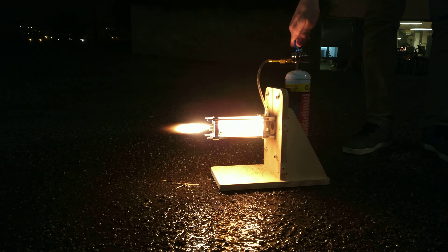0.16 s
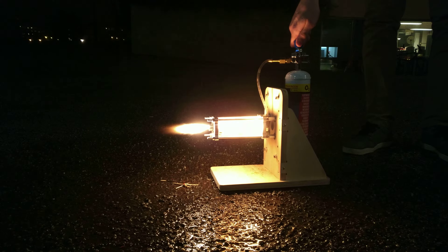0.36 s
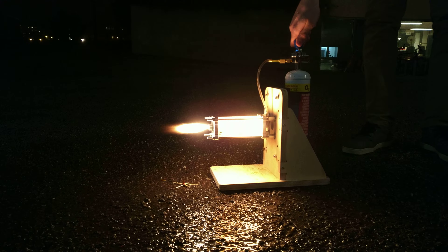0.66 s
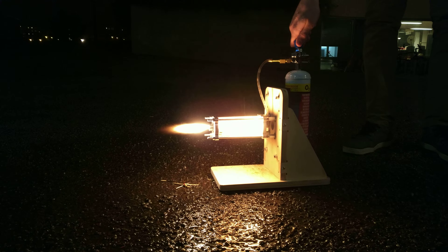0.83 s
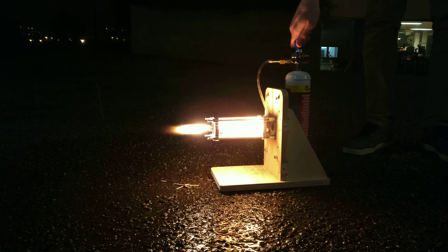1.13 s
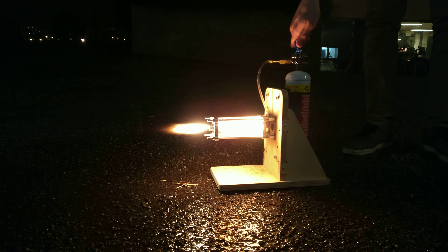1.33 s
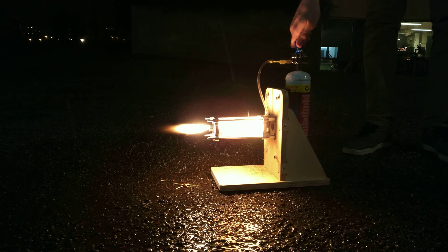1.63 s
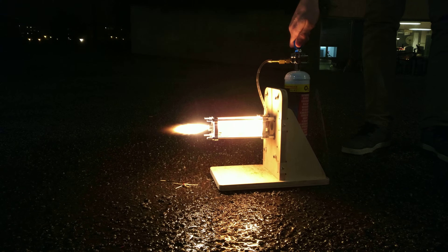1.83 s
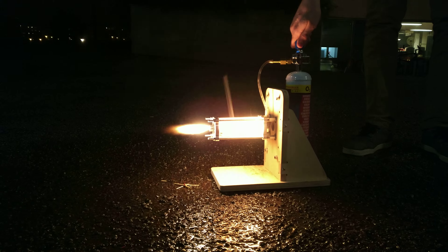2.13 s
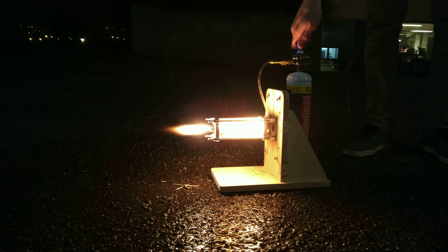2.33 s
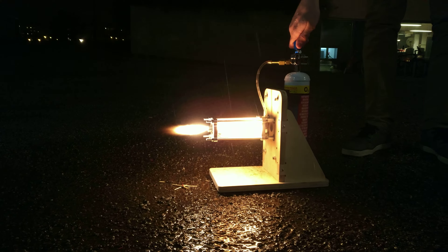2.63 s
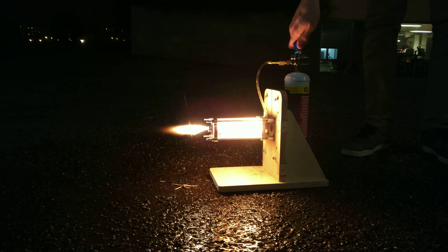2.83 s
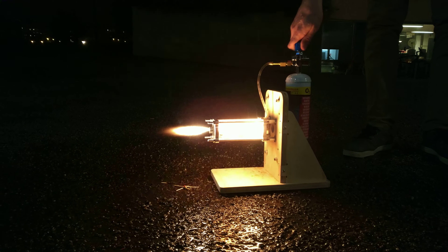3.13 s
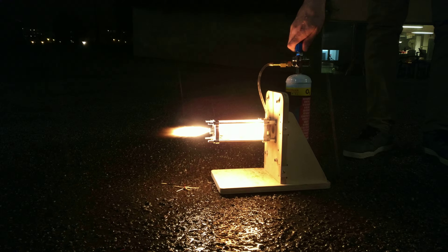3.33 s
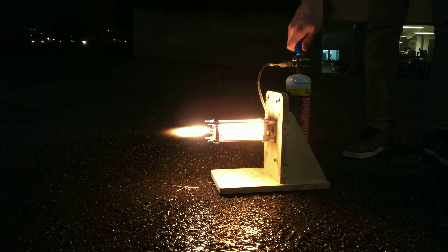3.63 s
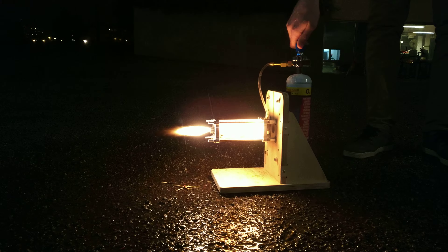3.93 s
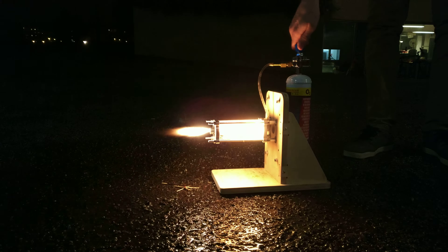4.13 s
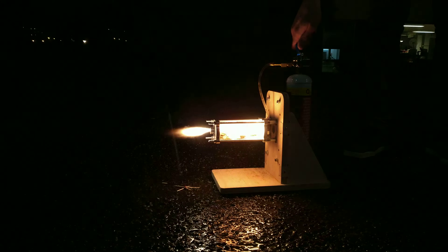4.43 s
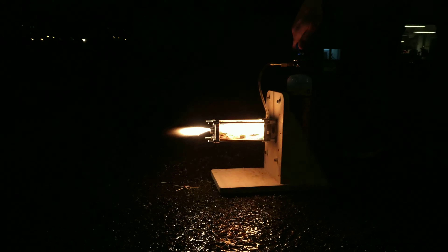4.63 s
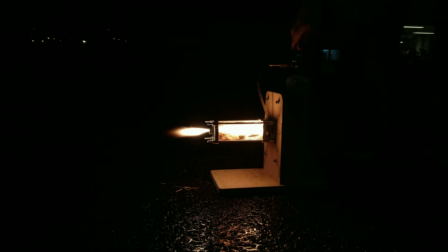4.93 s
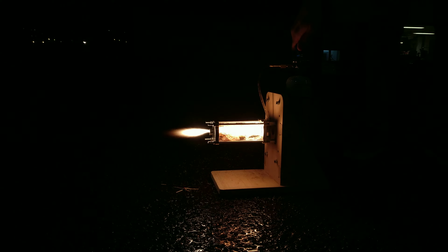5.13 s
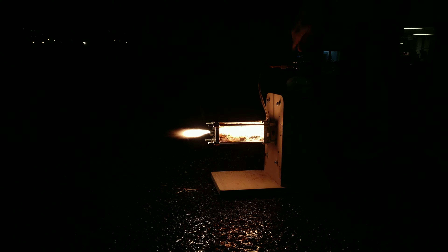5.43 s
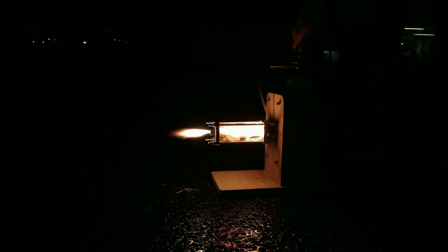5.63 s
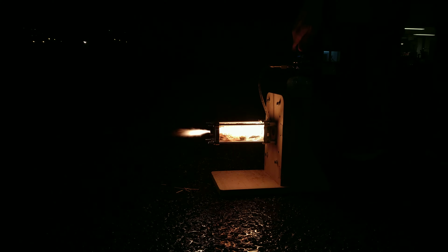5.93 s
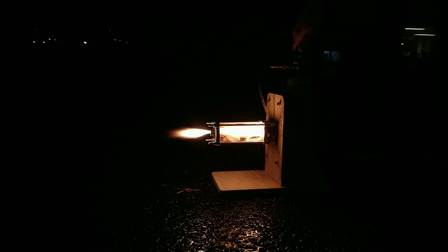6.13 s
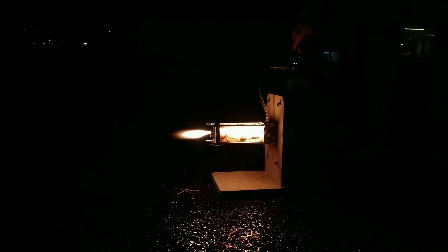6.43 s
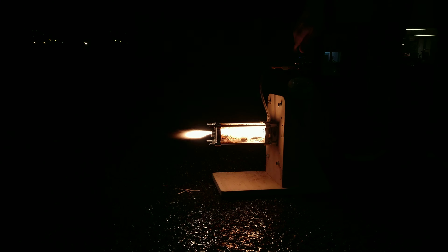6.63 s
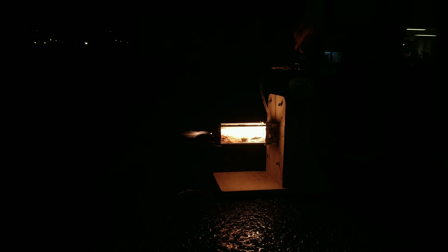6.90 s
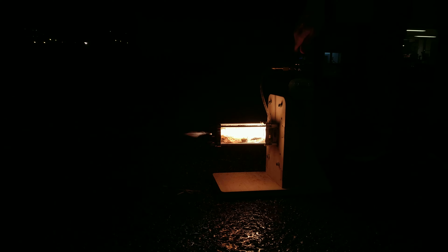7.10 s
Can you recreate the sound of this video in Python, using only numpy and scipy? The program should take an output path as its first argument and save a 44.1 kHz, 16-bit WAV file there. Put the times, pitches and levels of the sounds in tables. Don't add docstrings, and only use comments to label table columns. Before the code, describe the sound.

Already burning at the start and still going at the end, a jet of flame roars unevenly from a nozzle while cold gas hisses steadily above it. Thudding pops and quick stutters break in at irregular moments, sparse at first, then denser, with short drops as the flame lifts and snaps back. Open outdoor space, no room echo, only a very early bounce off wet ground; close phone microphones with shifting treble between left and right.

```python
import sys
import numpy as np
from scipy import signal
from scipy.fft import rfft, irfft
from scipy.io import wavfile
from scipy.ndimage import uniform_filter1d, map_coordinates

SR = 44100
rng = np.random.default_rng(int(sys.argv[2]) if len(sys.argv) > 2 else 0)


def persist_wave(psi):
    counts = np.round(np.clip(psi, -1, 1) * 32767).astype(np.int16)
    wavfile.write(sys.argv[1], SR, np.atleast_2d(counts).T)


def gain_from_decibels(decibels):
    exponent = np.asarray(decibels, float) / 20
    return 10 ** exponent


N = 320166
HZ = np.fft.rfftfreq(N, 1 / SR)
T = np.arange(N) / SR

# (frequency [Hz], left level [dB per Hz], right level [dB per Hz],
# share of flame against cold gas [0-1])
PORT_COLOURS = [(70, -58, -58.5, 0.95), (426, -66.5, -66.5, 0.87), (546, -57, -68, 1),
                (834, -62.5, -76.5, 0.99), (1510, -60.5, -64.5, 0.89), (2150, -59.5, -58.5, 0.9),
                (3070, -59, -61, 0.94), (4520, -51, -62.5, 0.67), (6210, -59, -61.5, 0.52),
                (7500, -62.5, -61, 0.28), (8720, -64, -64.5, 0.28), (10590, -56, -50.5, 0.14),
                (12600, -61.5, -52, 0.03), (15500, -58.5, -52, 0.05)]
# (frequency [Hz], likeness [0-1], right leads by [rad])
STEREO_LIKENESS = [(70, .99, -.1), (500, .99, -.9), (750, .94, -.4), (950, .87, .4), (1550, .4, 1.1),
                   (1880, .97, 2.8), (2120, .97, 2.8), (2260, .75, 1.5), (3600, .75, 1.2), (4300, .4, 2.4),
                   (6000, .65, 4.1), (7800, .9, 6.1), (8900, .85, 6.0), (9500, .65, 4.4), (11000, .65, 5.7),
                   (15500, .7, 6.1)]

# (time [s], extra path by the ground [cm], strength of the ground's treble [0-1])
GROUND_PATH = [(0, 11.5, 1), (.4, 11.25, 1), (1.3, 11.25, 1), (2, 11.45, 1), (2.7, 11.3, 1),
               (5.3, 11.35, 1), (5.9, 11.5, 1), (6.0, 11.8, .6), (6.85, 11.75, .6), (7.05, 11.4, .7),
               (7.26, 11.4, .8)]
ASPHALT_GAIN = [0.6, 0.83]
ASPHALT_TOP_HZ = [12000, 17600]
SOUND_CM_S = 34300

# (time [s], turn of the left port [-1 away from the jet to 1 towards it])
PHONE_TURN = [(0, -.9), (.5, -.45), (1.5, -0.77), (1.85, -.3), (2.95, -.6), (3.1, 0.74), (3.8, 1),
              (4.05, .8), (4.2, -.3), (4.65, -.3), (4.8, 0.37), (5.3, 0.83), (5.85, .5), (6.4, 0.66),
              (6.6, 0.14), (6.85, -.6), (7.05, -1.1), (7.26, -0.98)]
# (frequency [Hz], width [Hz], level at rest [dB], level per unit of turn [dB],
# drift [dB per s])
HAND_SHADE = [(11400, 240, 0, -6.5, 0.08), (13150, 630, -2.5, .5, 1.64), (14700, 810, 0.5, 4.5, 0.2)]

# (time [s], thump [dB], crack [dB])
SINGLE_POPS = [(.213, -2, -12), (.955, -2, 9), (1.316, -6, 11), (1.691, 1, -4), (2.428, 0, 5),
               (2.591, -5, -1), (2.708, -1, 6), (2.872, -5, -6), (2.936, -6, 5), (3.134, 1, 3),
               (3.149, -5, 0), (3.291, -5, 9), (3.393, -2, -2), (3.462, -3, 1), (5.114, -4, -9),
               (5.26, -5, 4), (5.324, -3, 6), (5.35, -3, 0), (5.375, -6, 4), (5.42, -7, -8),
               (5.713, -2, -2), (5.76, -2, 9), (5.801, 2, -13), (5.898, -2, 1), (6.021, -9, -8),
               (6.878, -7, -6), (7.136, -2, -5), (7.183, -1, 0), (7.206, 4, -2), (7.221, -4, -11.5)]
# (time [s], time lifted [ms], depth [dB], crack [dB])
FLAME_RELIGHTS = [(1.958, 14.4, 10, 4), (1.985, 18, 11, -8), (3.858, 15, 4, 4), (4.119, 42, 11.5, 0),
                  (4.188, 23, 5.5, -12), (4.528, 20.4, 10.5, 3), (4.887, 31, 8.5, 2), (5.03, 9.4, 3, 4),
                  (5.176, 13, 11, 4), (5.199, 12.8, 8, 6), (5.224, 16.7, 8, 4), (5.297, 10, 5, 3),
                  (5.405, 18, 7, 0), (5.555, 15, 5, 10), (5.689, 10.7, 13, -11), (5.79, 53, 8.5, 2),
                  (5.845, 15, 4, -4), (5.945, 17, 6, 3), (6.417, 17.6, 8.5, -5), (6.945, 51, 12, 10),
                  (6.996, 40, 13, 9), (7.05, 40, 9, 10), (7.079, 22, 13, -2), (7.119, 23, 13.5, -8),
                  (7.253, 20, 9, -4)]
# (start [s], length [ms], thump [dB], crack [dB])
STUTTER_RUNS = [(1.905, 27, -2, -2), (2.821, 29, -3, 1), (3.064, 21, -4, -6), (3.189, 27, -6, -9),
                (4.398, 19, -7, -6), (4.16, 13.5, -8, -11), (4.84, 7.7, -10, 0), (4.897, 12, -8, -3),
                (4.991, 11.8, 0, -6), (5.043, 11, -12, -3), (6.357, 30, -11, -10), (6.548, 23.6, -2, -3),
                (6.763, 12.3, -6, -9), (6.953, 6, -4, 0), (7.165, 5.4, -16, -7)]
# (time [s], flame level [dB])
VALVE_FLAME = [(0, 1.5), (.5, 0), (1, -0.5), (1.5, -0.2), (2.75, 1), (2.95, 2.1), (3.4, 2.5), (3.8, 1.9),
               (4.05, 2.5), (4.2, 0.8), (4.65, 2), (5.85, 2.2), (6.4, 3.5), (6.6, 2), (6.85, 2.6),
               (7.05, 2), (7.26, 1.5)]

# (frequency [Hz], width [Hz], level [dB])
DEAD_SPOTS = [
    [(9270, 170, -9), (10650, 200, -5), (12600, 300, -8), (1800, 40, -5)],
    [(3930, 100, -14), (6800, 80, -4), (1200, 60, -5)],
]
# (delay [ms], gain [ratio])
NEAR_BOUNCES = [
    [(1.333, -0.1), (1.565, -0.12), (2.161, -0.17), (2.651, 0.088), (2.783, -0.07), (3.062, -0.025),
     (3.244, -0.19)],
    [(0.496, -0.081), (0.592, -0.1), (1.264, -0.1), (2.898, -0.053), (3.918, 0.26), (4.076, 0.037),
     (5.883, 0.084)],
]


def shape(x, gain):
    return irfft(rfft(x) * gain, N)


def bump(hz, width):
    return np.exp(-.5 * ((HZ - hz) / width) ** 2)


def over_hz(table):
    hz, *columns = np.transpose(table)
    return [np.interp(np.log(HZ + 1), np.log(hz), c) for c in columns]


def over_time(table):
    s, *columns = np.transpose(table)
    return [np.interp(T, s, c) for c in columns]


def walk(rate):
    hold = int(SR / rate)
    steps = np.repeat(rng.standard_normal(N // hold + 1), hold)
    return 1.17 * uniform_filter1d(uniform_filter1d(steps, hold), hold)[:N]


def flame_share():
    return np.clip(over_hz(PORT_COLOURS)[2], 0, 1)


def port_noise(share):
    left_db, right_db, _ = over_hz(PORT_COLOURS)
    like, lead = over_hz(STEREO_LIKENESS)
    like = np.clip(like, 0, 1)
    common, own = rng.standard_normal((2, N)) * np.sqrt(SR / 2)
    left = shape(common, like * np.exp(-1j * lead) * gain_from_decibels(left_db) * share)
    left = left + shape(own, np.sqrt(1 - like ** 2) * gain_from_decibels(left_db) * share)
    right = shape(common, gain_from_decibels(right_db) * share)
    return np.array([left, right])


def ground(x):
    path_cm, treble = over_time(GROUND_PATH)
    at = np.arange(N) - path_cm / SOUND_CM_S * SR
    copy = np.array([map_coordinates(port, [at], order=5) for port in x])
    gains = [g / (1 + (HZ / hz) ** 4) for g, hz in zip(ASPHALT_GAIN, ASPHALT_TOP_HZ)]
    copy = shape(copy, np.array(gains))
    top = shape(copy, 1 / (1 + (12000 / (HZ + 1)) ** 8))
    return x + copy + (treble - 1) * top


def gas(turn):
    left, right = port_noise(np.sqrt(1 - flame_share())) * gain_from_decibels(0.1 * walk(3.4))
    for hz, width, rest_db, turn_db, drift_db in HAND_SHADE:
        shade = gain_from_decibels(rest_db + turn_db * turn + drift_db * T)
        left = left + (shade - 1) * shape(left, bump(hz, width))
    return np.array([left, right])


def all_pops(gap_ms=10, spread_db=2.5, spits_per_s=2):
    rows = list(SINGLE_POPS)
    for s, ms, _, crack_db in FLAME_RELIGHTS:
        relight = (s, -2, crack_db)
        blow_off = (s - ms / 1000, -6.5, -4)
        rows += [relight, blow_off]
    chances = rng.standard_normal((len(STUTTER_RUNS), 8, 3))
    for (s, ms, db, crack_db), chance in zip(STUTTER_RUNS, chances):
        count = min(round(ms / gap_ms) + 1, len(chance))
        late_ms, size, edge = chance[:count].T
        times = s + np.linspace(0, ms / 1000, count) + .001 * late_ms
        rows += zip(times, db + spread_db * size, crack_db + 2 * spread_db * edge)
    spits = rng.random((int(spits_per_s * N / SR), 3))
    return rows + list(spits * [T[-1], 8, 10] + [0, -22, -7.5])


def pops(ring_hz=103, sweep=0.624, sweep_ms=0.99, ring_ms=10.2, crack_hz=600, crack_ms=1.4):
    thump, crack, puff = np.zeros((3, N + 2000))
    t = np.arange(2000) / SR
    rows = all_pops()
    variation = 1 + 0.12 * rng.standard_normal((len(rows), 2))
    for (s, db, crack_db), (stretch, detune) in zip(rows, variation):
        start = max(int((s - .0005) * SR), 0)
        at = slice(start, start + len(t))
        turns = ring_hz * t / stretch + sweep * (1 - np.exp(-t / stretch / (sweep_ms / 1000)))
        ring = np.sin(2 * np.pi * turns) * np.exp(-(t / (ring_ms / 1000)) ** 2)
        snap = np.sin(2 * np.pi * crack_hz * detune * t) * np.exp(-t / (crack_ms / 1000))
        thump[at] += gain_from_decibels(1.15 * db) * ring
        crack[at] += gain_from_decibels(crack_db) * snap
        puff[at] += gain_from_decibels(crack_db) * np.exp(-t / 0.0035)
    thump = gain_from_decibels(-17.0) * np.tanh(3.96 * thump[:N])
    thump = thump + gain_from_decibels(-5.0) * signal.lfilter(*signal.iirpeak(52, 1.6, SR), thump)
    crack_gain = gain_from_decibels(np.array([[-21.], [-26.]]))
    both = thump + crack_gain * crack[:N]
    return shape(both, 1 / (1 + (HZ / 1500) ** 4)), puff[:N]


def roar(flame_db, puff):
    lifted_db = 0
    for s, ms, db, _ in FLAME_RELIGHTS:
        lifted_db = lifted_db + db * np.exp(-np.abs((T[::16] - s) / (ms / 2000) + 1.05) ** 3)
    lifted_db = np.repeat(lifted_db, 16)[:N]
    level_db = flame_db - lifted_db + 0.58 * walk(11)
    noise = port_noise(np.sqrt(flame_share()))
    low = 1 / (1 + (HZ / 700) ** 2)
    big = shape(noise, low) * gain_from_decibels(2.0 * walk(25) - 0.21 * lifted_db)
    fine = shape(noise, 1 - low) * gain_from_decibels(0.79 * walk(30))
    return (big + fine) * gain_from_decibels(level_db) * (1 + 0.55 * puff)


def scene():
    bangs, puff = pops()
    flame_db, = over_time(VALVE_FLAME)
    turn, = over_time(PHONE_TURN)
    return ground(roar(flame_db, puff) + gas(turn)) + bangs


def masked(x, under_db, wobble_db, cross, from_hz=1780, frame_start=59):
    hz, _, z = signal.stft(np.roll(x, -frame_start, axis=1), SR, window="cosine", nperseg=2048)
    power = np.abs(z) ** 2
    patch = uniform_filter1d(power, size=3, axis=1)
    around = uniform_filter1d(power + cross * power[::-1], size=110, axis=1)
    around = uniform_filter1d(around, size=5, axis=2)
    wobble = np.repeat(rng.standard_normal((2, 65, z.shape[2])), 16, axis=1)[:, :len(hz)]
    ratio = np.abs(patch) / (np.abs(around) + 1e-30)
    over_db = np.log(ratio + 1e-12) * 10 / np.log(10) + under_db + wobble_db * wobble
    over_db = over_db - 4.5 * np.exp(-((hz[:, None] - 5800) / 1000) ** 2)
    keep = np.where(hz[:, None] > from_hz, np.clip(over_db / 2, 0, 1), 1)
    kept = signal.istft(z * keep, SR, window="cosine", nperseg=2048)[1][:, :N]
    return np.roll(kept, frame_start, axis=1)


def low_pass(x):
    return signal.sosfilt(signal.butter(12, 15850, fs=SR, output="sos"), x)


def record(dry):
    housing = [gain_from_decibels(sum(db * bump(hz, width) for hz, width, db in dead)) for dead in DEAD_SPOTS]
    dull = 1 / (1 + (HZ / 8000) ** 4) / (1 + (280 / (HZ + 1)) ** 4)
    near = []
    for rows in NEAR_BOUNCES:
        near.append(1 + dull * sum(g * np.exp(-2j * np.pi * HZ * ms / 1000) for ms, g in rows))
    heard = shape(dry, np.array(housing) * np.array(near))
    heard = .95 * np.tanh(heard / .95)
    low_cut_hz, top_hz = 41, 15770
    edges = (HZ < top_hz) / np.sqrt(1 + (low_cut_hz / (HZ + 1)) ** 14)
    heard = masked(shape(heard, edges), under_db=7., wobble_db=3.5, cross=.6)
    swap = np.array([[1, 1], [1, -1]]) / np.sqrt(2)
    heard = swap @ masked(swap @ heard, under_db=10., wobble_db=3., cross=.15)
    return low_pass(heard)


dry = scene()
out = record(dry)
persist_wave(out)
```